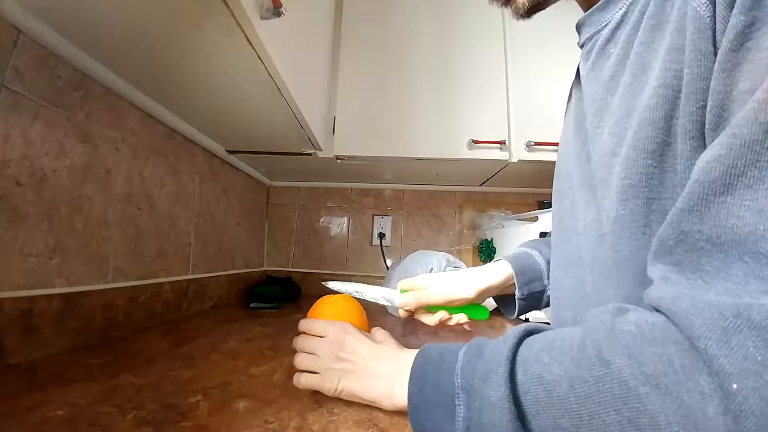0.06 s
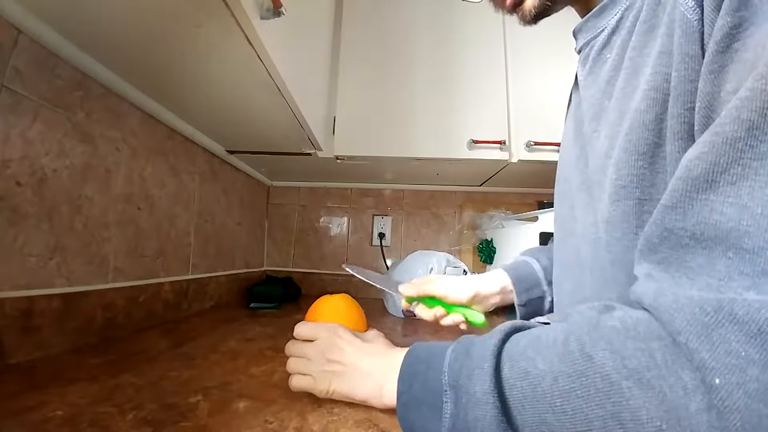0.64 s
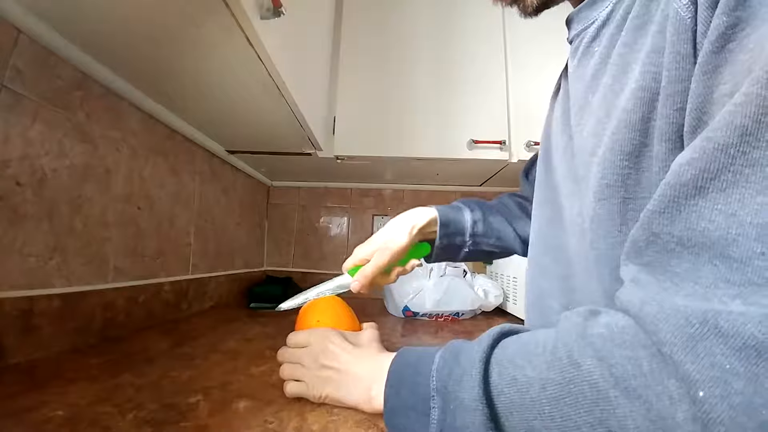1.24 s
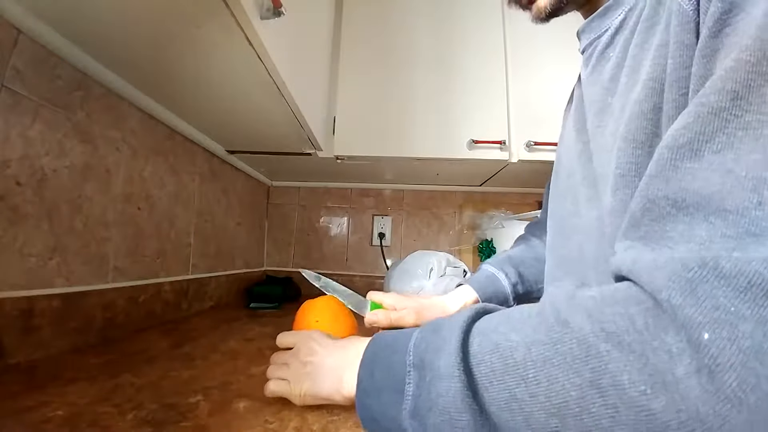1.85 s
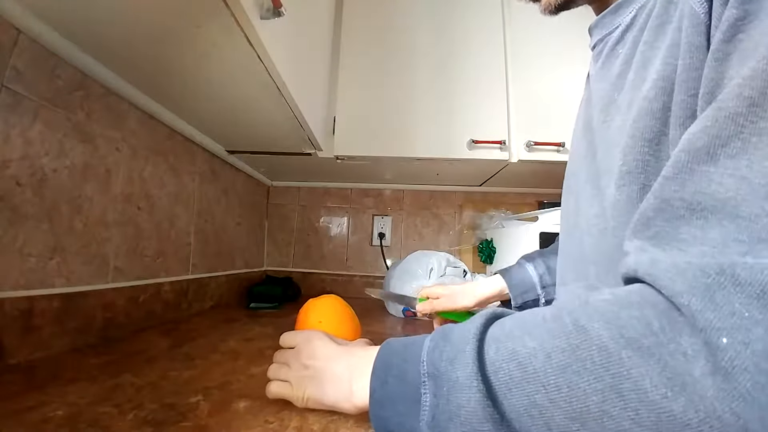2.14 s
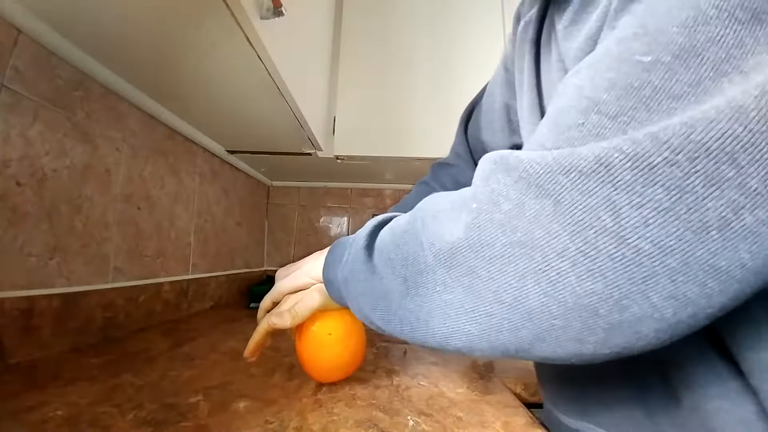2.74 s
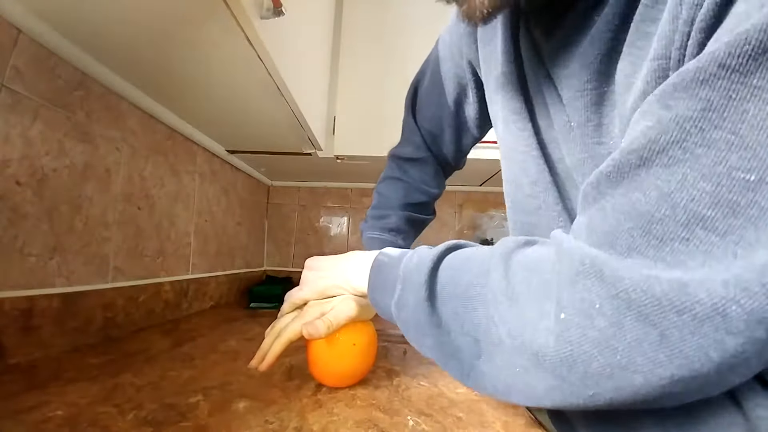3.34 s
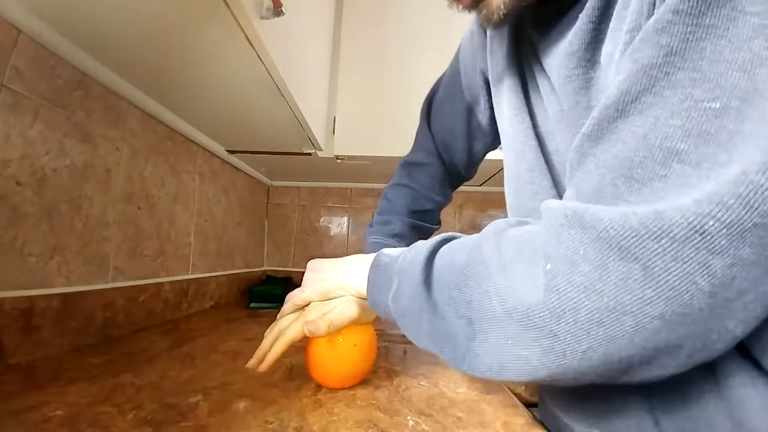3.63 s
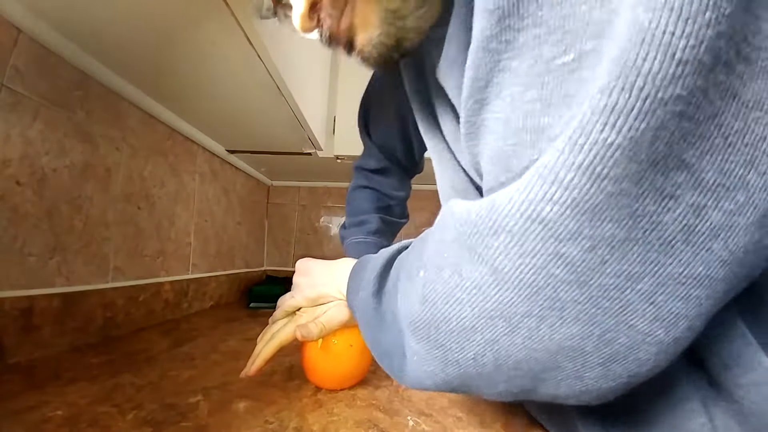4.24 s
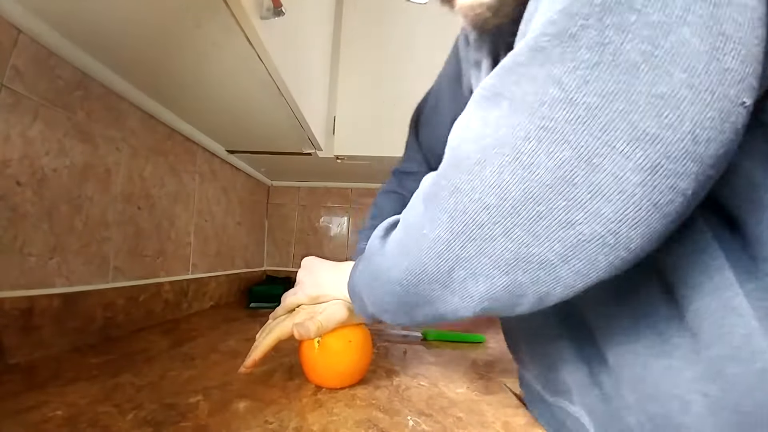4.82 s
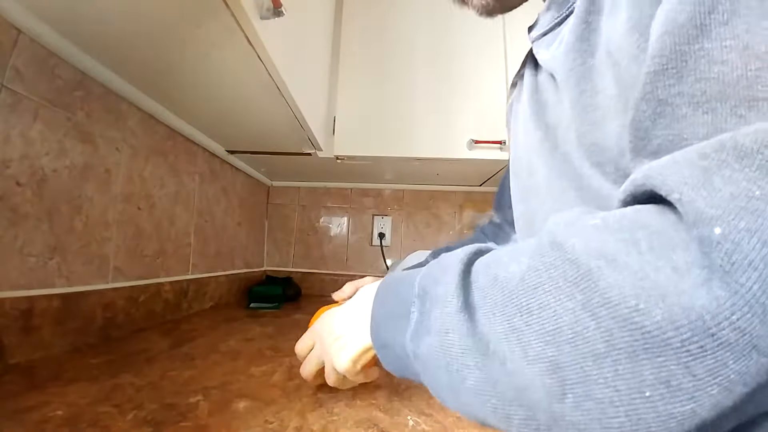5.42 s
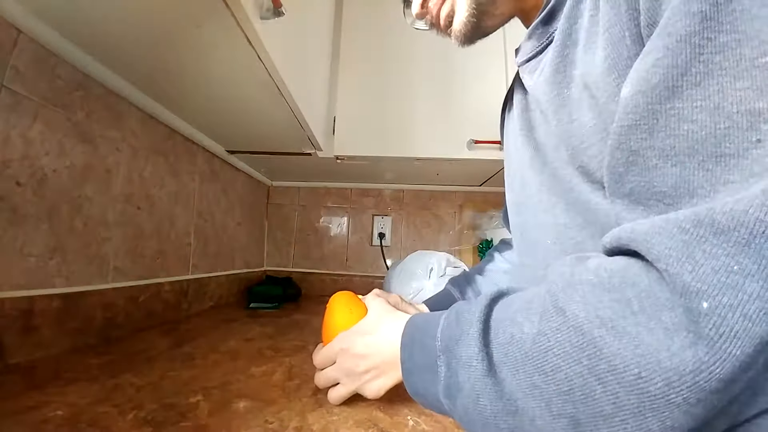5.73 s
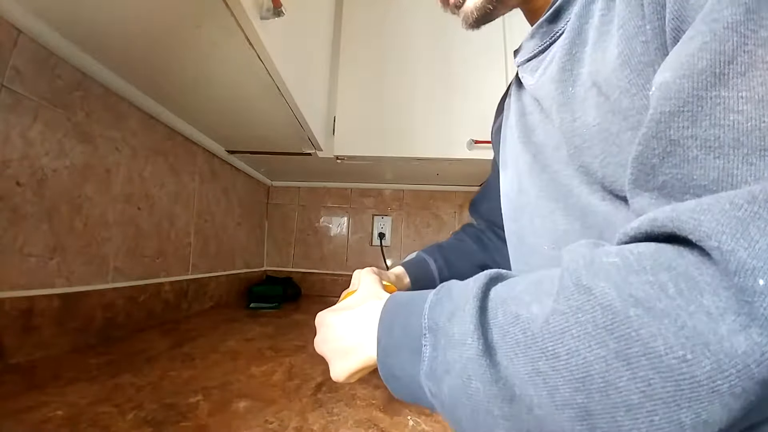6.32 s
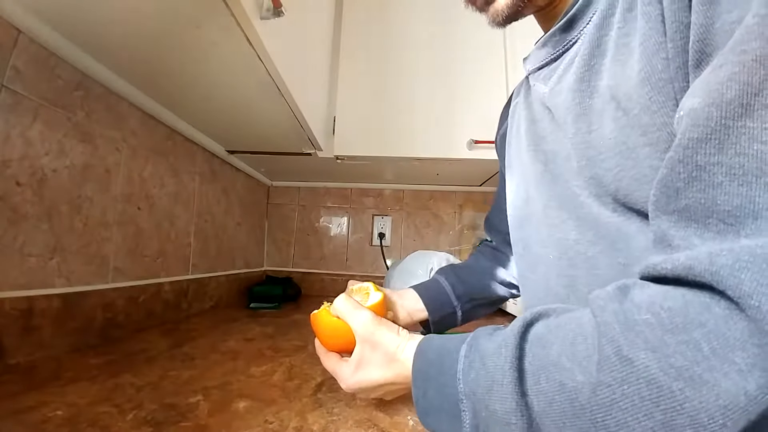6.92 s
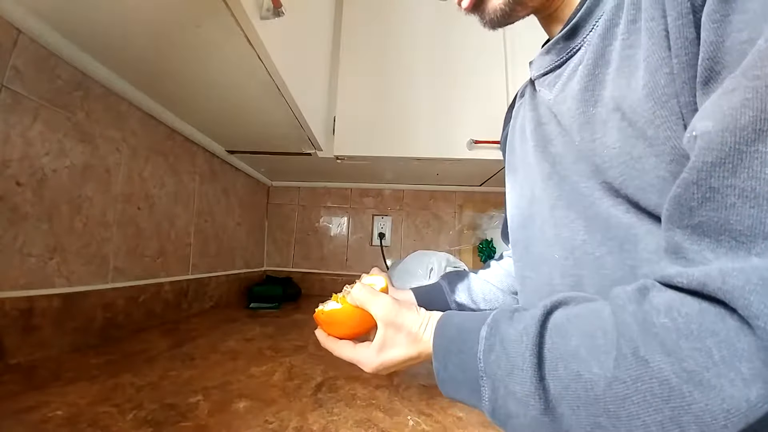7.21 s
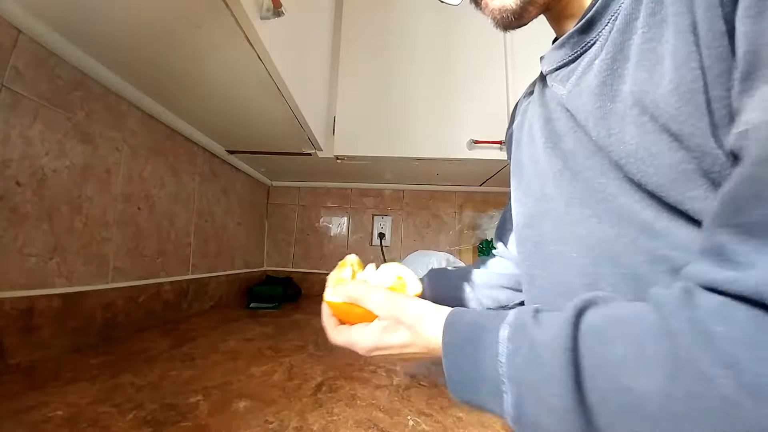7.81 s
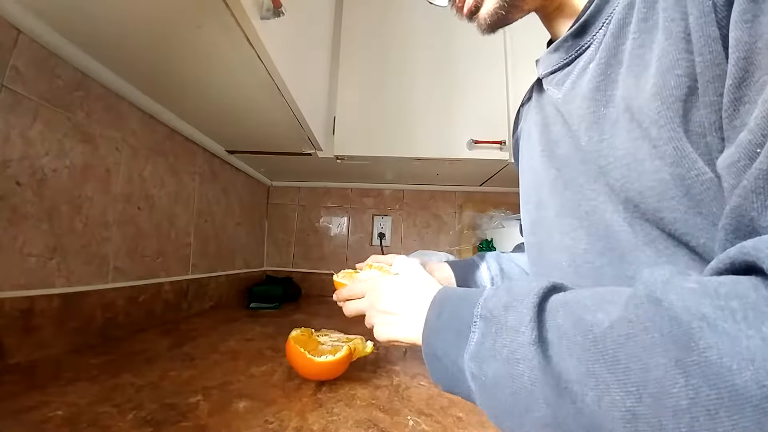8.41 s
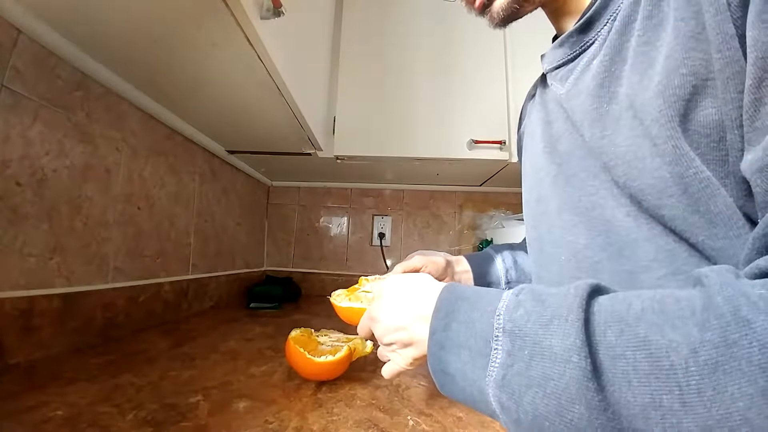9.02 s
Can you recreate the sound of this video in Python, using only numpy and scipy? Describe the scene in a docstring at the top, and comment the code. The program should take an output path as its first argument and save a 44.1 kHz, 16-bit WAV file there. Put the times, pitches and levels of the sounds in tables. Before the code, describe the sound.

An appliance hums steadily in a small kitchen. A knife scores an orange with faint, short rasps and soft bumps, then drops onto the counter in a loud, ringing clatter. The peel gives dull cracks under a palm and bursts with wet snaps and a thud. The halves tear apart in a soft crackle, and one is set down gently. Hands rustle faintly, all heard close in stereo.

```python
"""An appliance hums in a small kitchen throughout; hands rustle and tiny juice bubbles pop now and then.
A knife scores an orange in short rasps, pushing it against the counter (0.2-2 s), then drops
and bounces, blade and counter ringing (2.3 s). Under a palm the peel cracks (from 3.6 s) and bursts
with wet snaps (5.1 s). The halves tear apart fibre by fibre (6.7 s); one is set down with a soft bump."""
import sys
import numpy as np
from scipy import signal
from scipy.fft import rfft, irfft
from scipy.io import wavfile
from scipy.ndimage import uniform_filter1d, minimum_filter1d

SR = 44100
rng = np.random.default_rng(int(sys.argv[2]) if len(sys.argv) > 2 else 0)


def put_to_file(sound):
    """Save the sound as 16-bit audio at rate SR, in the file named by the first command-line argument."""
    columns = np.atleast_2d(sound).T  # one column per channel
    safe = np.clip(columns, -1, 1)
    whole_steps = np.round(safe * 32767)
    wavfile.write(sys.argv[1], SR, whole_steps.astype(np.int16))


N = 399546


def amp(db):
    return 10 ** (np.asarray(db) / 20)


def unit_rms(x):
    return x / np.sqrt(np.mean(x ** 2) + 1e-20)


def unit_burst(x, size=88):
    """Scale the loudest window of `size` samples to rms 1."""
    return x / np.sqrt(uniform_filter1d(x ** 2, size, mode="constant").max())


def curve_at(points, hz):
    f, value = np.transpose(points)
    return np.interp(np.log(hz + 1), np.log(f), value)


def add(mix, start_s, sound):
    part = mix[round(start_s * SR):][:len(sound)]
    part += sound[:len(part)]


def highpass(x, cutoff_hz, order):
    return signal.sosfilt(signal.butter(order, cutoff_hz, "high", fs=SR, output="sos"), x)


def coloured(x, spectrum, tilt_db_oct=0, size=4096):
    """Minimum-phase filter: the spectrum, tilted about 1 kHz."""
    hz = abs(np.fft.fftfreq(size, 1 / SR))
    octaves = np.log2(np.maximum(hz, 200) / 1000)
    log_gain = np.log(amp(curve_at(spectrum, hz) + tilt_db_oct * octaves))
    taps = np.fft.ifft(np.exp(np.conj(signal.hilbert(log_gain)))).real
    return signal.oaconvolve(x, taps[:size // 2])[:len(x)]


def burst(spectrum, tilt_db_oct=0, *, decay_s, window=88):
    """Sudden contact or break: a rush of tiny impulses that dies at once."""
    t = np.arange(4096) / SR
    noise = rng.standard_normal(len(t)) * np.exp(-t / decay_s)
    return unit_burst(coloured(noise, spectrum, tilt_db_oct), window)


def ring(modes, tilt_db_oct, scatter_db, size=6615):
    """Damped modes; scatter_db varies their shares with where the blow lands."""
    hz, db, t60_s = np.transpose(modes)[:, :, None]
    t = np.arange(size) / SR
    db = db + tilt_db_oct * np.log2(hz / hz[0]) + scatter_db * rng.standard_normal(hz.shape)
    polarity = np.where(hz > 600, rng.choice([-1, 1], hz.shape), 1)
    decay = np.exp(-np.log(1000) * t / t60_s)
    return (polarity * amp(db) * decay * np.sin(2 * np.pi * hz * t)).sum(0)


def grains(count, per_s, spread_db):
    """Random clicks: many small, a few large."""
    out = np.zeros(count)
    at = np.flatnonzero(rng.random(count) < per_s / SR)
    db = spread_db * np.minimum(rng.exponential(1, len(at)), 4)
    out[at] = amp(db) * rng.choice([-1, 1], len(at))
    return out


def crackle(spectrum, ticks_per_s, spread_db, fizz_db):
    """Separate ticks over a fine fizz."""
    ticks = unit_rms(grains(N, ticks_per_s, spread_db))
    fizz = unit_rms(grains(N, per_s=5000, spread_db=4))
    return unit_rms(coloured(ticks + amp(fizz_db) * fizz, spectrum))


def effort(spells, attack_s, release_s):
    """Envelope of handwork: each spell builds, holds and lets go."""
    t = np.arange(N) / SR
    return sum(amp(db) * np.clip(np.minimum((t - s) / attack_s, (s + length_s - t) / release_s), 0, 1)
               for s, length_s, db in spells)


# microphone pair: f/Hz, left-right coherence
COHERENCE = [(60, .72), (130, 0.92), (290, 0.89), (640, 1), (1410, 0.51), (3100, 0.27), (6000, 0)]
def stereo(x):
    """Blend two signals into a pair: alike in the bass, unlike in the treble."""
    coherence = np.clip(curve_at(COHERENCE, np.fft.rfftfreq(x.shape[1], 1 / SR)), -1, 1)
    mid, side = rfft(x) * np.sqrt([(1 + coherence) / 2, (1 - coherence) / 2])
    return irfft([mid + side, mid - side], x.shape[1])


# room decay: f/Hz, t60/s
ROOM_T60 = [(200, 0.14), (1000, 0.097), (4000, 0.079), (14000, 0.072)]
def kitchen(source, wet_db, size=16384):
    """Two paths with unlike fine detail, plus the short tail of tiles and cupboards."""
    paths = np.array([source(), source()])
    hz, frame_s, noise = signal.stft(rng.standard_normal((2, size)), SR, nperseg=256)
    decay = np.exp(-np.log(1000) * frame_s / curve_at(ROOM_T60, hz)[:, None])
    tail = signal.istft(noise * decay, SR, nperseg=256)[1][:, :size]
    onset = np.clip(np.arange(size) / SR / 0.0014 - 0.5, 0, 1)
    tail = stereo(tail * onset)
    reverb = signal.oaconvolve(paths[:1], tail / np.linalg.norm(tail[0]), axes=1)[:, :N]
    return stereo(paths) + amp(wet_db) * reverb


# air rush: f/Hz, level/dB
AIR_SPECTRUM = [(25, -35), (90, -33.5), (130, -11), (200, 3.5), (330, 2), (600, -1.5), (1000, -6),
                (1200, -6), (1650, -19.5), (2200, -7.5), (3200, -8), (4200, -23), (7500, -28.5),
                (16000, -35)]
# fan resonances: f/Hz, half-width/Hz, level/dB
FAN_BANDS = [(241.5, 25, -77.5), (407, 40, -59.5), (512, 19, -62), (857, 29, -63), (946.4, 54, -56),
             (1330, 15, -65.5), (1467, 37, -63.5), (1984, 243, -55.5)]
# motor tones: f/Hz, level/dB, rms wander/Hz
MOTOR_TONES = [(236, -53.5, 5), (299.6, -51.5, 1.5), (734, -61.5, 3)]
def appliance(air_db=-53, drift_hz=12):
    """Broad rush of air, resonant fan noise and wavering motor tones."""
    hz = np.fft.rfftfreq(N, 1 / SR)
    power = (amp(air_db) * unit_rms(amp(curve_at(AIR_SPECTRUM, hz)))) ** 2
    for centre_hz, half_width_hz, db in FAN_BANDS:
        resonance = 1 / (1 + ((hz - centre_hz) / half_width_hz) ** 2)
        power += (amp(db) * unit_rms(resonance)) ** 2
    out = stereo(irfft(rfft(rng.standard_normal((2, N))) * np.sqrt(power), N))
    for centre_hz, db, wander_hz in MOTOR_TONES:
        drift = unit_rms(irfft(rfft(rng.standard_normal(N)) * np.exp(-(hz / drift_hz) ** 2), N))
        phase = 2 * np.pi * np.cumsum(centre_hz + wander_hz * drift) / SR
        out += amp(db) * unit_rms(np.sin(phase))
    return out


# hand movements: t/s, length/s, level/dB
HAND_MOVES = [(0, 0.82, -60.5), (4.72, 0.24, -61), (5.3, 0.49, -58.5), (6.4, 1.89, -58.5), (8.2, 0.79, -61)]
# fingers and sleeves: f/Hz, level/dB
RUSTLE_SPECTRUM = [(200, -2), (450, 4), (1200, 3.5), (2500, 9.5), (5000, -1.5), (8000, -17), (12000, -15.5),
                   (16000, -17)]
def handling(holding_db=-65, sticky_rel_db=-15.5):
    """Fingers and sleeves rustle; skin ticks as it lifts off wet rind."""
    hands = np.maximum(effort(HAND_MOVES, attack_s=0.056, release_s=0.13), amp(holding_db))
    rustle = crackle(RUSTLE_SPECTRUM, ticks_per_s=200, spread_db=2.5, fizz_db=3)
    sticky = unit_rms(coloured(grains(N, per_s=12, spread_db=1.5), SNAP_SPECTRUM))
    return hands * (rustle + amp(sticky_rel_db) * sticky)


# juice bubbles: t/s, level/dB, starting f/Hz
BUBBLE_POPS = [(0.1113, -44.5, 7750), (0.734, -54, 10000), (.735, -52.5, 6250), (2.8424, -51, 7770),
               (5.2661, -47, 13190), (6.063, -54, 12500), (7.6826, -46, 10700), (8.506, -45, 10100)]
def bubbles(decay_s=0.00087, rise_per_s=20, film_rel_db=-8):
    """The film breaks with a tick; the bubble rings, its pitch rising as it opens."""
    out, t = np.zeros(N), np.arange(SR // 20) / SR
    for s, db, hz in BUBBLE_POPS:
        add(out, s, amp(db + film_rel_db) * burst(SNAP_SPECTRUM, decay_s=0.0022))
        cycles = hz * t * (1 + rise_per_s * t / 2) + rng.random()
        add(out, s, amp(db) * unit_burst(t * np.exp(-t / decay_s) * np.sin(2 * np.pi * cycles)))
    return out


# knife strokes: t/s, length/s, rasp level/dB, push level/dB
KNIFE_STROKES = [(0.22, 0.014, -50, -43.5), (0.299, 0.018, -51, -41.5), (.341, .026, -44.5, -37),
                 (0.5, 0.042, -45.5, -35), (1.255, 0.021, -50, -45), (1.313, .03, -46.5, -38.5),
                 (1.706, .028, -49, -41), (1.764, 0.033, -57, -42), (2.010, 0.022, -53, -46)]
# finger rubs: t/s, length/s, level/dB, tilt/(dB/oct)
FINGER_RUBS = [(2.625, .097, -57.5, 6), (2.735, 0.078, -56, 3.5), (3.032, 0.066, -49.5, 1),
               (5.07, 0.03, -37.5, 6), (5.132, .032, -44, 5), (5.196, 0.052, -40, 1),
               (6.333, 0.087, -42, -1), (6.662, 0.049, -42, 3.5), (8.881, .066, -50.5, 5.5)]
# scraped peel: f/Hz, level/dB
RASP_SPECTRUM = [(150, -49.5), (600, -13), (950, 5.5), (1250, -5), (1600, -2), (2400, 5.5), (3500, -10),
                 (4600, -6.5), (7000, -12), (10000, -18), (14000, -18.5), (16000, -20)]
def rasps(blade_db_oct=2):
    """Peel cells break in a grainy rasp under blade or finger."""
    out = np.zeros(N)
    cuts = [(s, length_s, db, blade_db_oct) for s, length_s, db, _ in KNIFE_STROKES]
    for s, length_s, db, tilt in cuts + list(FINGER_RUBS):
        count = round(length_s * SR)
        rasp = coloured(grains(count, per_s=5000, spread_db=2), RASP_SPECTRUM, tilt)
        add(out, s, amp(db) * unit_rms(rasp) * signal.windows.tukey(count, 0.8))
    return out


# fruit on counter: t/s, level/dB, tilt/(dB/oct)
FRUIT_BUMPS = [(.772, -40, 3.5), (1.003, -39, -1.5), (1.541, -42.5, -14), (1.641, -46, -1),
               (1.904, -46, -9), (2.476, -44.5, -12.5), (2.631, -35, -14.5), (2.754, -37, -8),
               (5.0913, -21, 3), (5.0959, -16.5, 0.5), (5.1068, -23.5, 2.5), (5.2249, -25, -1),
               (5.256, -34, -15), (7.525, -40, -1), (8.168, -33, -6)]
# counter modes: f/Hz, level/dB, t60/s
COUNTER_MODES = [(189, 17.5, 0.081), (237.6, 18, 0.062), (306.6, 9.5, 0.038), (400, -2.5, 0.036),
                 (494, 7, .05), (545.3, 7, 0.078), (666, 1.5, 0.1), (830, 7.5, 0.074), (870, 13.5, 0.083)]
# squashing flesh: f/Hz, level/dB
THUD_SPECTRUM = [(120, -24), (200, 2.5), (320, 5), (520, 0.5), (900, -10), (1250, -20.5), (2200, -17.5),
                 (5000, -40.5), (12000, -81)]
def bumps(thud_rel_db=-3, push_db_oct=-0.5, settle_s=0.016, settle_rel_db=-12, settle_db_oct=-8.5):
    """Soft fruit thuds, wakes the counter's low modes, then settles with a duller bump."""
    out = np.zeros(N)
    # the fruit tips onto the counter 40% into each knife stroke
    pushes = [(s + 0.4 * length_s, db, push_db_oct) for s, length_s, _, db in KNIFE_STROKES]
    blows = list(FRUIT_BUMPS) + pushes
    settles = [(s + settle_s, db + settle_rel_db, tilt + settle_db_oct) for s, db, tilt in blows]
    for s, db, tilt in blows + settles:
        add(out, s, amp(db) * unit_burst(ring(COUNTER_MODES, tilt, scatter_db=4), size=220))
        add(out, s, amp(db + thud_rel_db) * burst(THUD_SPECTRUM, tilt, decay_s=0.0057, window=220))
    return highpass(out, cutoff_hz=165, order=6)  # steep low cut, as from the microphone


# pulls on the halves: t/s, length/s, level/dB
HALF_PULLS = [(6.732, 0.303, -55.5), (7.055, 0.092, -57.5)]
# tearing pulp: f/Hz, level/dB
PULP_SPECTRUM = [(100, -35), (500, -15), (2500, 4), (4500, -1.5), (7000, -3), (9300, -5), (10600, 4.5),
                 (12000, -10), (14000, -3), (16000, -5)]
def tearing(gap_s=0.029, fibre_rel_db=14, scatter_db=4.5, tilt_db_oct=7, scatter_db_oct=3.5):
    """Under the pull, juice sacs crackle and fibres snap at uneven intervals."""
    sacs = crackle(PULP_SPECTRUM, ticks_per_s=150, spread_db=3.5, fizz_db=-10)
    fibres = np.zeros(N)
    for start_s, length_s, _ in HALF_PULLS:
        for s in np.arange(start_s, start_s + length_s, gap_s):
            strength, brightness = rng.uniform(-1.1, 1, 2)
            snap = burst(PULP_SPECTRUM, tilt_db_oct + scatter_db_oct * brightness, decay_s=0.0023)
            add(fibres, s + gap_s * rng.random(), amp(fibre_rel_db + scatter_db * strength) * snap)
    return effort(HALF_PULLS, attack_s=0.036, release_s=0.04) * (sacs + fibres)


# dry cracks, wet snaps: t/s, level/dB, tilt/(dB/oct)
DRY_CRACKS = [(3.5803, -20, 1), (4.033, -36, -3), (4.3515, -28.5, -2), (5.080, -34, -4),
              (5.1572, -24.5, 0.5), (5.2150, -27.5, -1.5), (5.3862, -41, 0)]
WET_SNAPS = [(.654, -48, -4), (5.0905, -16, -5.5), (5.0927, -13, -2.5), (5.1075, -26, -4), (5.140, -36, 4),
             (5.624, -48, -4.5), (6.6951, -27, 5.5), (6.8595, -38, 2), (7.821, -54, -1),
             (7.8594, -30.5, -1.5)]
# their spectra: f/Hz, level/dB
CRACK_SPECTRUM = [(100, -29.5), (250, -7), (400, 6), (550, 11.5), (750, 2.5), (1100, -3), (1500, 2),
                  (2200, 5.5), (3000, -7), (5000, -11), (7500, -14.5), (12000, -28), (16000, -40)]
SNAP_SPECTRUM = [(100, -43.5), (700, 0), (1400, -7.5), (2300, -0.5), (3400, 9.5), (4300, -1.5),
                 (5500, -0.5), (7200, 2.5), (10000, 4), (12500, -2.5), (16000, -5)]
def peel():
    """Dull cracks while the peel holds under the palm; bright snaps as peel and membranes part."""
    out = np.zeros(N)
    for s, db, tilt in DRY_CRACKS:
        add(out, s, amp(db) * burst(CRACK_SPECTRUM, tilt, decay_s=0.0059))
    for s, db, tilt in WET_SNAPS:
        add(out, s, amp(db) * burst(SNAP_SPECTRUM, tilt, decay_s=0.0016))
    return out


def orange():
    """The fruit and the hands working it."""
    return handling() + bubbles() + rasps() + tearing() + peel()


# knife bounces: t/s, level/dB, tilt/(dB/oct)
KNIFE_BOUNCES = [(2.2787, -7, 0.5), (2.2932, -12, -2.5), (2.3048, -8, 0.5), (2.3433, -6, -1),
                 (2.3710, -15, -1.5), (2.3755, -8.5, 2), (2.379, -7, -2), (2.3830, -7, 1),
                 (2.389, -16, -3.5), (2.4025, -14.5, -0.5)]
# steel-on-counter contact: f/Hz, level/dB
CLACK_SPECTRUM = [(40, -41), (110, -37), (175, -10.5), (390, 1), (560, -6), (720, -8.5), (920, 1.5),
                  (1200, -7), (2000, 2.5), (3200, 3), (4600, -7), (7200, -0.5), (9500, -7.5),
                  (12500, -16.5), (16000, -19)]
# joint modes of blade and counter: f/Hz, level/dB
KNIFE_MODES = [(190, -15), (377, -9.5), (535, -8), (851, -9), (1421, -2), (1565, -6), (2018, -4),
               (2070, -1), (2159, -2), (2541, -3.5), (2998, -2.5), (3102, 5.5), (3239, -6), (3560, -1.5),
               (3640, -9), (3964, -4), (4975, -6), (6900, -10.5), (7526, -6)]
def knife_drop(ring_rel_db=-7.5, t60_1khz_s=0.077):
    """Each bounce clacks and sets blade and counter ringing; high modes die first."""
    modes = [(hz, db, t60_1khz_s * (hz / 1000) ** -0.15) for hz, db in KNIFE_MODES]
    out = np.zeros(N)
    for s, db, tilt in KNIFE_BOUNCES:
        add(out, s, amp(db) * burst(CLACK_SPECTRUM, tilt, decay_s=0.0025))
        add(out, s, amp(db + ring_rel_db) * unit_burst(ring(modes, tilt, scatter_db=0)))
    return highpass(out, cutoff_hz=150, order=4)


def scene():
    """Fruit and knife in the humming kitchen."""
    return (appliance() + kitchen(bumps, wet_db=-7)
            + kitchen(orange, wet_db=-7.5) + kitchen(knife_drop, wet_db=-8))


# microphone imbalance: f/Hz, left minus right level/dB
MIC_BALANCE = [(200, 0.5), (700, 5), (1200, -2.5), (2400, -1.3), (6000, 1)]
def record(dry, ceiling=0.95, window=133, cutoff_hz=16300):
    """Slightly unequal microphones, fast peak limiter, low-pass."""
    lean_db = curve_at(MIC_BALANCE, np.fft.rfftfreq(N, 1 / SR)) / 2
    heard = irfft(rfft(dry) * amp([lean_db, -lean_db]), N)
    gain = 1 / np.maximum(abs(heard).max(0) / ceiling, 1)
    held_gain = minimum_filter1d(gain, 2 * window)
    smooth_gain = uniform_filter1d(uniform_filter1d(held_gain, window), window)
    lowpass = signal.firwin(255, cutoff_hz, window=("kaiser", 9), fs=SR)
    return signal.oaconvolve(heard * smooth_gain, lowpass[None], "same")


dry = scene()
out = record(dry)
put_to_file(out)
```